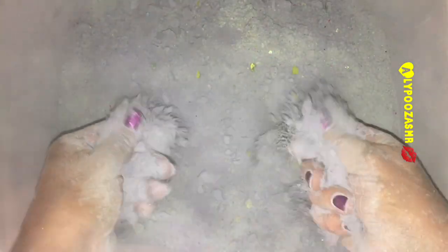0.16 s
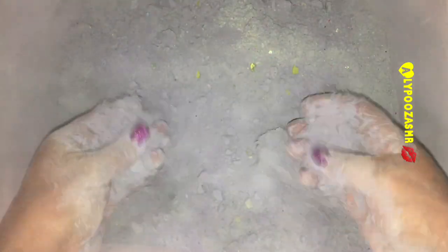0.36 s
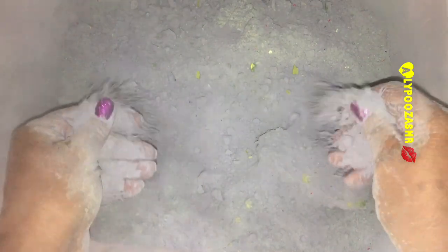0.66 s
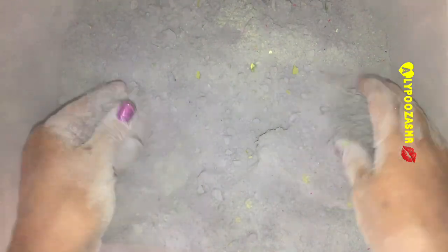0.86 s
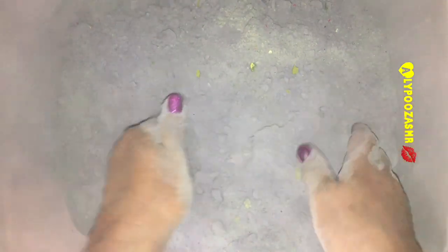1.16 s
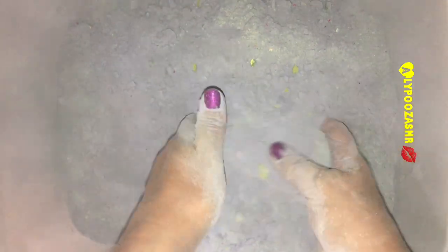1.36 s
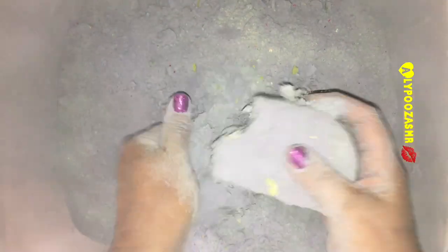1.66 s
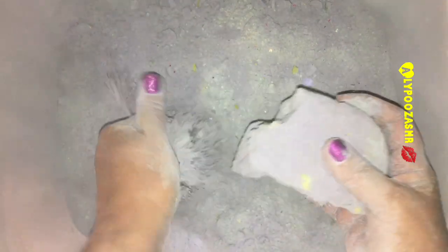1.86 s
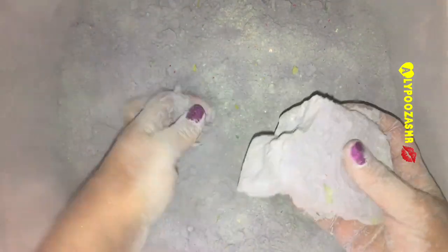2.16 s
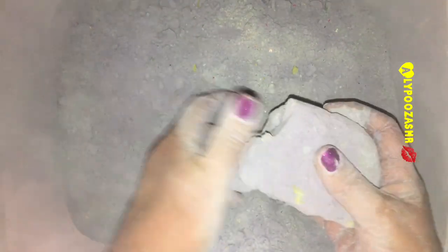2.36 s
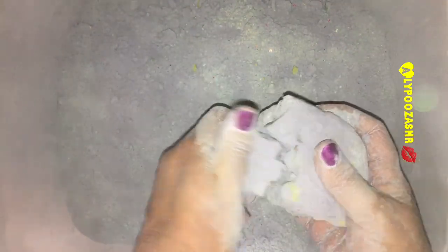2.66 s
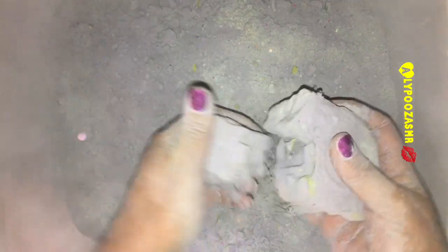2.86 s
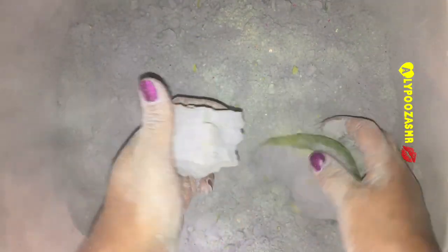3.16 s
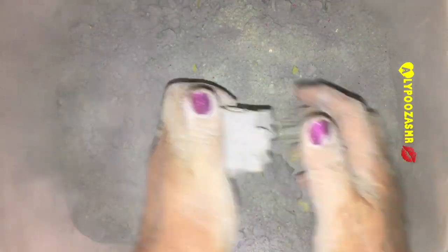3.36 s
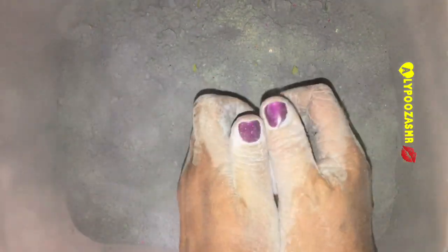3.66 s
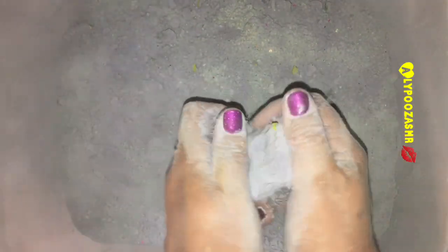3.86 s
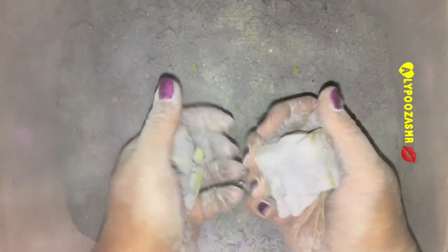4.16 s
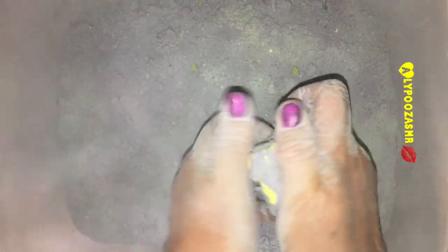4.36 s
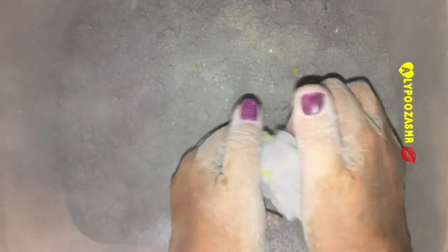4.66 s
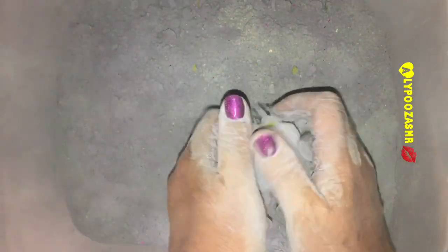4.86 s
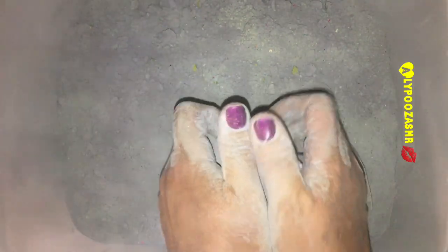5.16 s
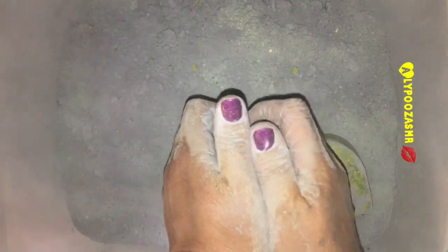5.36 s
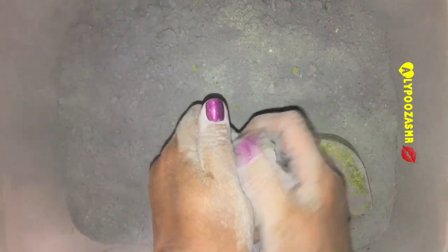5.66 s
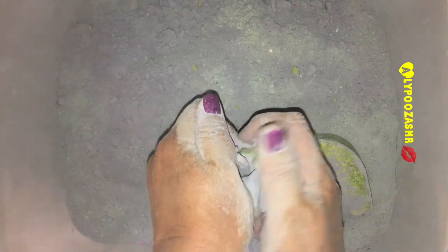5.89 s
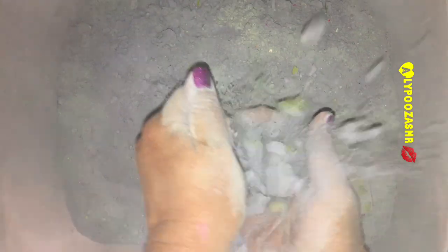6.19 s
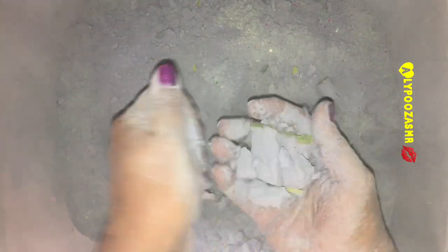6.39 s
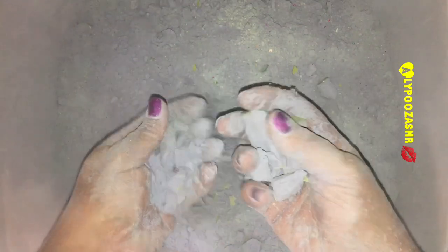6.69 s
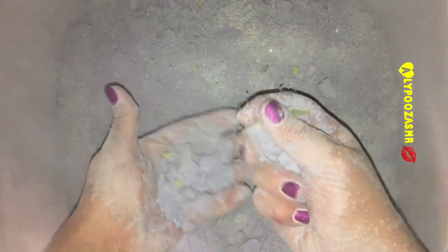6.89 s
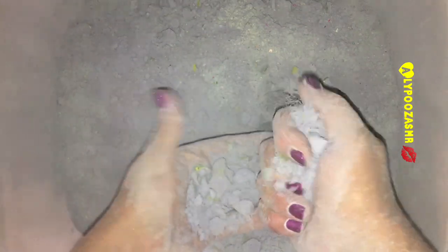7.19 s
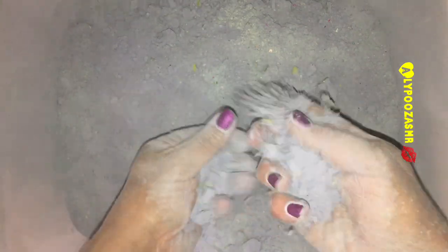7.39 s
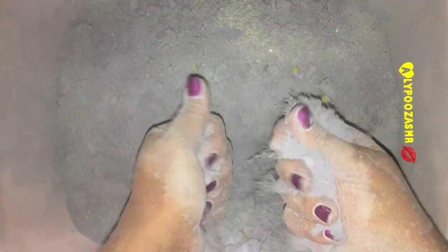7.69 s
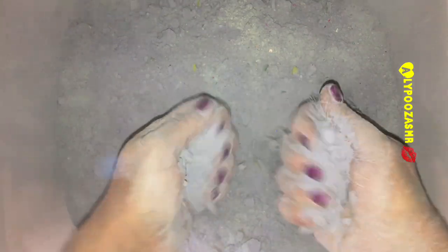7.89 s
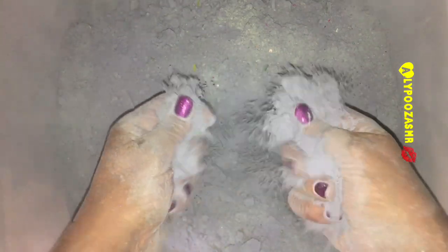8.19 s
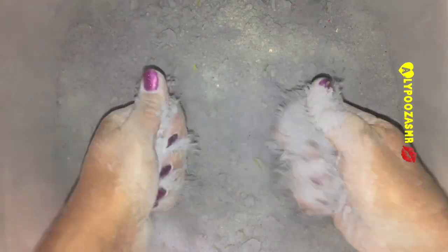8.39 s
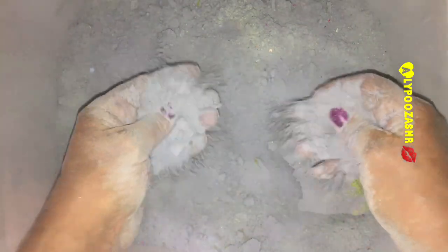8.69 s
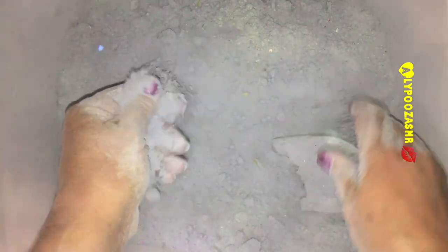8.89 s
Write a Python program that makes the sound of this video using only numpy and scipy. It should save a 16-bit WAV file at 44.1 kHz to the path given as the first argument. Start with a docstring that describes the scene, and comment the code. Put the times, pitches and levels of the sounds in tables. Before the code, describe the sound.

Close dry chalk crumbling: powder rustle, a boomy block knock, small snaps, one loud cluster of crunching cracks, then crumbs and gritty rubbing.

```python
"""Hands crush soft chalk blocks over a plastic tub, close to a small microphone.
Powder hiss and gritty crackle are dense streams of clumping clicks, filtered and played by finger effort;
scrapes are noise in gliding resonances. Snaps ring damped chalk modes, click, splinter and knock the tub.
Crumbs patter on the tub wall, dropped blocks and knuckles boom its floor, and faint room noise lies below."""
import sys
import numpy as np
from scipy import signal
from scipy.io import wavfile
from scipy.ndimage import uniform_filter1d

SR = 44100
rng = np.random.default_rng(int(sys.argv[2]) if len(sys.argv) > 2 else 0)


def put_to_file(sound):
    """Save the sound as 16-bit audio at rate SR, in the file named by the first command-line argument."""
    columns = np.atleast_2d(sound).T  # one column per channel
    safe = np.clip(columns, -1, 1)
    whole_steps = np.round(safe * 32767)
    wavfile.write(sys.argv[1], SR, whole_steps.astype(np.int16))


N = 398663

# Relative spectrum of hissing powder: pitch_hz [Hz], level_db [dB]
POWDER_SPECTRUM = [(2500, -7.5), (4000, -10), (5500, -3.5), (7000, 0.5), (8700, 2), (10500, -4),
                   (13000, -15.5), (16000, -28)]
# Relative spectrum of crackling grit and dry clicks: pitch_hz [Hz], level_db [dB]
GRIT_SPECTRUM = [(900, -8.5), (1500, -12.5), (2000, -3), (2400, -2), (2900, -1.5), (3600, -1.5),
                 (5000, -5.5), (8000, -11)]
# Modes of the plastic tub wall: pitch_hz [Hz], relative level_db [dB], t60_s [s]
WALL_MODES = [(300, -4, 0.036), (450, -3.5, 0.01), (615, 17, 0.0094), (850, 12.5, 0.023), (980, 22, 0.0076),
              (1460, 15.5, 0.016)]


def handling():
    """Streams of grains played by the effort of the fingers, and the tub trembling under the hands."""
    # Steady finger work: start_s [s], powder_db [dB], grit_db [dB],
    # crumbs_db on the tub [dB relative to grit], ticks_db of breaking crumbs [dB relative to grit]
    steady_work = [(0, -55.5, -51.5, 2, -13), (.85, -50, -53, -2.5, -3), (1.1, -52.5, -51, -1, -10),
                   (1.35, -59.5, -51, 7, -30), (1.55, -59.5, -58, 11.5, -4), (1.8, -56.5, -54, 1.5, -15),
                   (2.2, -60, -57, 0.5, -7), (2.45, -60, -59, -4.5, -11), (2.8, -61.5, -63, -13, -4),
                   (3.05, -51, -53.5, 4, -12), (3.3, -61, -67.5, -7.5, -3), (3.9, -59, -61, -18, -15),
                   (4.4, -54.5, -59.5, -29, -16), (5, -61, -62.5, -18, -3), (5.6, -55.5, -55.5, -13, -23),
                   (6.4, -53, -62.5, 2.5, 3), (6.7, -50, -55, 1, 2.5), (7.5, -51.5, -52, 3, -3),
                   (8, -54.5, -56.5, 3, -5), (8.3, -47, -50.5, -0.5, 0), (8.7, -53.5, -53, -2, -13.5),
                   (9.04, -43.5, -48.5, -5.5, -3)]
    # Relative spectrum of the tub's trembling: pitch_hz [Hz], level_db [dB]
    shake_spectrum = [(12, 24), (20, 12.5), (33, -4), (55, -4), (90, -10), (160, -9.5), (250, -18),
                      (400, -30), (800, -32)]
    shake_level_db = -41
    t = np.arange(N) / SR
    start_s, *columns = np.transpose(steady_work)
    powder_db, grit_db, crumbs_db, ticks_db = (np.interp(t, start_s, c) for c in columns)
    rubbing = effort(powder_db, column=2)
    grinding = effort(grit_db, column=3)

    powder = colour(grains(per_s=14000, spread_db=1.0, clump_db=2.5, clump_s=0.018), POWDER_SPECTRUM)
    grit = colour(grains(per_s=2100, spread_db=0.5, clump_db=2.0, clump_s=0.013), GRIT_SPECTRUM)
    crumb_hits = grains(per_s=1200, spread_db=2.5, clump_db=3.0, clump_s=0.024)
    crumbs = signal.oaconvolve(crumb_hits, ring(WALL_MODES))[:N]
    ticks = crumb_ticks(t[:400])
    shake = colour(grains(per_s=2800, spread_db=1.5, clump_db=2.5, clump_s=0.13), shake_spectrum)

    hiss = rubbing * evened(patchy(powder, 0.75))
    tremble = amp(shake_level_db) * evened(shake)
    crackle = evened(patchy(grit, 2.13))
    patter = amp(crumbs_db) * evened(crumbs)
    breaking = amp(ticks_db) * evened(ticks)
    return hiss + tremble + grinding * (crackle + patter + breaking)


def crumb_ticks(t):
    """Crumbs break with one of twelve chalk pitches each, mixed with dry clicks of grit and powder colour."""
    breaks = grains(per_s=260, spread_db=1.6, clump_db=1.0, clump_s=0.06)
    size = rng.integers(0, 12, N)
    breaks = np.clip(breaks, -3, 3)  # holds down the largest ticks
    pitched = sum(signal.oaconvolve(breaks * (size == k), chip(hz, t))[:N]
                  for k, hz in enumerate(np.geomspace(700, 3600, 12)))
    gritty_click = amp(1) * evened(colour(breaks, GRIT_SPECTRUM))
    powdery_click = amp(-3.5) * evened(colour(breaks, POWDER_SPECTRUM))
    return evened(pitched) + gritty_click + powdery_click


def effort(steady_db, column):
    """Gain of one stream: the steady work with its pauses, plus each rub's quick rise, hold and slower fall."""
    # The fingers let go for a moment: middle_s [s], length_s [s], dip_db [dB]
    pauses = [(0.343, 0.083, -7), (0.876, 0.027, -29), (2.353, 0.22, -13), (3.414, 0.12, -10),
              (3.71, 0.07, -10), (4.046, 0.029, -9), (4.3, 0.06, -12), (5.415, 0.024, -18),
              (5.7, 0.031, -14), (5.84, 0.082, -7.5), (6.35, 0.035, -11), (6.586, 0.17, -4.5),
              (7.22, 0.45, -6.5), (8.953, 0.026, -25)]
    # Single rubs and squeezes: start_s [s], hold_s [s], powder_db [dB], grit_db [dB]
    rubs = [(0.124, 0.032, -42.5, -47), (0.442, 0.016, -70, -46), (0.538, 0.14, -55, -51.5),
            (0.915, 0.047, -36, -33), (1.021, 0.035, -42.5, -45.5), (1.171, 0.067, -63, -43.5),
            (1.84, 0.054, -49, -51), (2.01, 0.015, -45.5, -51.5), (2.423, 0.07, -56, -58.5),
            (2.609, 0.014, -50, -46.5), (3.067, 0.076, -51.5, -45.5), (3.203, 0.016, -47, -59),
            (3.517, 0.048, -57, -55), (3.781, 0.0069, -47, -40), (3.836, 0.021, -50, -55),
            (4.138, 0.012, -51.5, -53.5), (4.258, 0.011, -47.5, -54.5), (4.345, 0.16, -46.5, -72),
            (4.53, 0.078, -43.5, -50), (4.716, 0.015, -46.5, -54), (4.868, 0.023, -45, -51.5),
            (4.947, 0.069, -56, -55.5), (5.076, 0.0097, -41.5, -47.5), (5.185, 0.024, -51, -57),
            (5.439, 0.073, -53, -52.5), (5.887, 0.03, -50, -50), (6.054, 0.013, -50, -42.5),
            (6.242, 0.067, -62, -42), (6.504, 0.041, -41, -53.5), (6.734, 0.067, -52, -53),
            (6.941, 0.11, -48.5, -51.5), (7.096, 0.082, -46, -58.5), (7.302, 0.01, -36, -72),
            (7.64, 0.086, -49, -52), (7.843, 0.04, -40, -78), (8.194, 0.06, -71, -47),
            (8.737, 0.097, -65, -46), (8.984, 0.07, -40, -38)]
    rise_db_per_s, fall_db_per_s = 521, 341
    step = 32  # samples between points of the gain curve
    t = np.arange(0, N, step)[:, None] / SR
    middle_s, length_s, dip_db = np.transpose(pauses)
    dips_db = (dip_db * np.exp(-(2 * (t - middle_s) / length_s) ** 4)).sum(1)
    start_s, hold_s, rub_db = np.transpose(rubs)[[0, 1, column]]
    before_db = rise_db_per_s * np.maximum(start_s - t, 0)
    after_db = fall_db_per_s * np.maximum(t - start_s - hold_s, 0)
    rubs_db = rub_db - before_db - after_db
    power = amp(steady_db[::step] + dips_db) ** 2 + (amp(rubs_db) ** 2).sum(1)
    return np.interp(np.arange(N) / SR, t[:, 0], np.sqrt(power))


def grains(per_s, spread_db, clump_db, clump_s):
    """Clicks of uneven size that come in clumps as the fingers slip."""
    chance, size = rng.random(N), rng.exponential(1, N)
    sign, slip = rng.standard_normal(N), rng.standard_normal(N)  # sign also varies the strength
    width = max(int(clump_s * SR), 2)
    clumps = evened(uniform_filter1d(uniform_filter1d(slip, width), width))
    level_db = spread_db * np.minimum(size, 5) + clump_db * clumps
    return (chance < per_s / SR) * sign * amp(level_db)


def patchy(x, patch_db):
    """Random drifting patches of colour across pitch and time."""
    z = signal.stft(x, nperseg=256)[2]
    field = rng.standard_normal(z.shape)
    for _ in range(2):
        field = uniform_filter1d(field, size=6, axis=0)  # across pitch
        field = uniform_filter1d(field, size=14, axis=1)  # along time
    return signal.istft(z * amp(patch_db * evened(field)), nperseg=256)[1][:N]


def scrapes():
    """Friction noise through one gliding resonance, swelling and fading."""
    # Pitched scrapes and one low scuff: start_s [s], end_s [s], level_db before the fades [dB],
    # first_hz [Hz], last_hz [Hz], width_hz [Hz]
    pitched_scrapes = [(1.148, 1.248, -39.5, 6760, 6800, 600), (1.22, 1.387, -40, 870, 980, 330),
                       (1.08, 1.22, -39.5, 129, 203, 121), (1.41, 1.56, -48.5, 860, 720, 248),
                       (3.145, 3.173, -42, 885, 890, 150), (4.32, 4.415, -50.5, 3500, 3450, 400),
                       (4.358, 4.428, -49.5, 1950, 1720, 250), (4.393, 4.527, -46.5, 2650, 2450, 300),
                       (4.515, 4.595, -48, 3440, 3800, 500)]
    out, noise = np.zeros(N), rng.standard_normal(N)
    for start_s, end_s, level_db, first_hz, last_hz, width_hz in pitched_scrapes:
        rub = noise[round(start_s * SR):round(end_s * SR)]
        hz = np.linspace(first_hz, last_hz, len(rub))
        scrape = evened(resonate(rub, hz, width_hz))
        add(out, start_s, amp(level_db) * scrape * np.hanning(len(rub)) ** 0.5)
    return out


def resonate(x, hz, width_hz):
    """Shifts the curve hz down to zero, smooths, and shifts back: a moving resonance of gain 1."""
    turn = np.exp(2j * np.pi * np.cumsum(hz) / SR)
    r = np.exp(-np.pi * width_hz / SR)
    return 2 * (turn * signal.lfilter([1 - r], [1, -r], x / turn)).real


def snaps():
    """A crack and dying smaller cracks ring the chalk, click dryly, splinter and knock the tub."""
    # Snapping pieces: time_s [s], level_db before the parts are mixed [dB], ring_hz [Hz],
    # splinters_db before colouring and mixing [dB], crumbling_t60_s [s]
    breaks = [(0.136, -32, 930, -37, 0.042), (0.445, -19.5, 670, -18.5, 0.037),
              (0.453, -40, 940, -40, 0.015), (0.479, -19, 905, -30, 0.034), (0.891, -27, 850, -32, 0.073),
              (0.902, -13, 674, -38, 0.053), (1.148, -25, 730, -45, 0.038), (1.866, -27.5, 850, -26, 0.085),
              (2.15, -34, 630, -59, 0.13), (2.405, -40, 7250, -31, 0.19), (2.603, -29.5, 1050, -51, 0.13),
              (2.647, -22.5, 2630, -18, 0.024), (3.012, -32, 1480, -48, 0.054),
              (3.062, -28, 1550, -50, 0.046), (3.087, -20, 2060, -47, 0.051),
              (3.262, -34, 2050, -53, 0.021), (3.44, -39.5, 756, -31, 0.058),
              (3.746, -31.5, 2070, -19.5, 0.032), (3.773, -16.5, 2460, -12, 0.12),
              (3.775, -17.5, 6450, -33, 0.03), (4.26, -49, 6900, -17, 0.081),
              (4.669, -36, 3700, -23.5, 0.011), (4.836, -24, 920, -20.5, 0.043),
              (5.208, -25, 6640, -15.5, 0.014), (5.302, -31, 2880, -22, 0.16),
              (5.436, -19, 2800, -17, 0.019), (5.435, -22, 2150, -28, 0.037),
              (5.469, -20.5, 2280, -26, 0.067), (5.486, -17.5, 6400, -9, 0.0067),
              (5.667, -31, 3340, -25, 0.023), (5.7262, -11, 3420, -1.5, 0.019),
              (5.7292, -10.5, 3650, -11, 0.066), (5.732, -20, 8400, -19, 0.027),
              (5.867, -27.5, 2150, -25, 0.039), (5.892, -21.5, 6200, -36, 0.049),
              (6.052, -6, 2010, -6, 0.048), (6.0522, -10, 866, -8, 0.05), (6.132, -31.5, 3380, -26, 0.077),
              (6.192, -27, 700, -38, 0.02), (6.195, -13.5, 4100, -41, 0.0061),
              (6.201, -11.5, 7000, -33, 0.0056), (6.2182, -1.5, 1040, -21, 0.026),
              (6.2192, -0.5, 1043, -17, 0.033), (6.24, -19, 920, -8.5, 0.014),
              (6.268, -16, 1730, -14, 0.008), (6.2769, -3, 870, -32, 0.022), (6.2751, -5, 1620, -15, 0.034),
              (6.286, 2.5, 935, -9, 0.0072), (6.301, -22, 3000, -14, 0.013),
              (6.348, -14.5, 6860, -10, 0.014), (6.357, -19, 7400, -43, 0.031),
              (6.435, -28, 3700, -38, 0.069), (6.7328, -24.5, 1460, -28, 0.0091),
              (6.755, -26.5, 3330, -12, 0.049), (6.856, -26, 3000, -40, 0.046),
              (6.887, -24, 2780, -25, 0.036), (6.95, -25, 2560, -43, 0.029), (7.019, -23, 2310, -16, 0.019),
              (7.035, -24.5, 1920, -38, 0.026), (7.08, -26, 2620, -41, 0.023),
              (7.118, -26, 2580, -37, 0.18), (7.13, -29, 1450, -19, 0.015), (7.45, -24.5, 6870, -39, 0.018),
              (7.565, -24, 3050, -41, 0.028), (7.621, -23, 850, -36, 0.017), (7.63, -20.5, 676, -45, 0.025),
              (7.641, -20, 850, -32, 0.045), (8.203, -19, 2050, -36, 0.0073), (8.228, -25, 649, -35, 0.045),
              (8.26, -27.5, 2330, -26, 0.019), (8.763, -25.5, 1120, -46, 0.019),
              (8.775, -22.5, 1170, -42, 0.04)]
    piece, clicks, splinters, knocks = np.zeros((4, N))
    t = np.arange(4000) / SR
    swell_s, lead_s = 0.005, 0.0035  # noise swells up to the crack from lead_s before the listed time
    noise = rng.standard_normal((len(breaks), 2, len(t)))
    sizes = rng.uniform(-0.68, 1, (len(breaks), 3))
    crack = 1.0 * (np.arange(len(t)) == int(swell_s * SR))
    for (time_s, level_db, hz, splinters_db, t60_s), z, size in zip(breaks, noise, sizes):
        start_s = time_s - lead_s
        decay = amp(-60 * np.maximum(t - swell_s, 0) / max(t60_s, 0.004))
        fade = decay * np.minimum(t / swell_s, 1) ** 3.5
        crumbling = 0.042 * z[0] * abs(z[1]) ** 1.93 * fade  # uneven small cracks
        cracking = crack + crumbling
        body = signal.oaconvolve(crack, chip(hz, t[:500]))
        # the small cracks are dealt out to three fragments of other pitches
        rest = sum(signal.oaconvolve(crumbling * (np.arange(len(t)) % 3 == k),
                                     chip(hz * 2 ** (0.65 * octaves), t[:500]))
                   for k, octaves in enumerate(size))
        octaves_up = np.log2(hz / 800)
        add(piece, start_s, amp(level_db) * (body + rest) / abs(body).max())
        add(clicks, start_s, amp(level_db - 5.0 * octaves_up) * cracking)
        add(splinters, start_s, amp(splinters_db) * (z[0] * fade + 0.5 * cracking))
        # larger, lower pieces jolt the tub more
        add(knocks, start_s, amp(level_db - 3.0 * octaves_up) * cracking)
    dry_clicks = amp(1) * colour(clicks, GRIT_SPECTRUM)
    treble = amp(-13.5) * colour(splinters, POWDER_SPECTRUM)
    return amp(-4) * piece + dry_clicks + treble + amp(-15) * knock_wall(knocks)


def chip(hz, t):
    """Soft-fronted impulse response of a heavily damped chalk piece; high modes weaken in small pieces."""
    # Modes of a chalk piece: multiple of its lowest ring [ratio], relative level_db [dB]
    chalk_modes = [(1.0, 15.5), (1.74, 16), (2.23, 11.5), (2.74, 10.5)]
    total = 0
    for multiple, level_db in chalk_modes:
        mode_hz = multiple * hz
        level = amp(level_db) * (mode_hz < SR / 4) / np.hypot(1, (mode_hz / 2600) ** 2)
        damping = np.exp(-np.pi * (230 + 0.077 * mode_hz) * t)  # higher modes die sooner
        total = total + level * damping * np.sin(2 * np.pi * mode_hz * t)
    return total * (1 - np.exp(-(t * hz / 0.26) ** 2))


def drops():
    """Each crumb clicks dryly and knocks the tub wall; some are more click, some more knock."""
    # Crumbs that drop on the tub: time_s [s], level_db before click and knock are balanced [dB]
    falling_crumbs = [(0.47, -28), (2.054, -38), (2.139, -33), (2.22, -32), (2.967, -29), (3.03, -36),
                      (4.969, -33), (4.977, -30), (6.09, -25), (6.173, -30), (6.249, -17), (6.465, -35),
                      (6.501, -30), (6.596, -39), (6.683, -34), (6.701, -27), (6.815, -35), (6.823, -28),
                      (6.949, -30), (6.965, -25), (6.983, -24), (7.019, -28), (7.119, -21), (7.301, -28),
                      (7.359, -33), (7.399, -26), (7.431, -25), (7.466, -29), (7.762, -28), (7.813, -35),
                      (7.975, -30), (8.138, -26), (8.339, -21), (8.347, -22), (8.433, -28), (8.5, -47),
                      (8.536, -35), (8.55, -37), (8.679, -41), (8.708, -31), (8.967, -15.5)]
    time_s, level_db = np.transpose(falling_crumbs)
    lean_db = 4.3 * rng.uniform(-0.49, 1, len(falling_crumbs))  # towards click
    at = np.round(time_s * SR).astype(int)
    clicks, knocks = np.zeros((2, N))
    clicks[at] = amp(level_db + lean_db)
    knocks[at] = amp(level_db - lean_db)
    return amp(7.5) * colour(clicks, GRIT_SPECTRUM) + amp(-6.5) * knock_wall(knocks)


def knock_wall(knocks):
    """Rings the tub wall with each knock, the response scaled to a peak of 1."""
    wall = ring(WALL_MODES)
    return signal.oaconvolve(knocks, wall / abs(wall).max())[:N]


def thumps():
    """A soft push of up to some milliseconds sets the tub floor booming."""
    # Blocks and knuckles on the floor: time_s [s], peak_db [dB], hardness_db [dB per octave], push_s [s]
    floor_hits = [(0.472, -34, -22, 0.0068), (0.89, -11, 3, 0.0076), (0.903, -7.5, -5.5, 0.0036),
                  (1.021, -25.5, -4, 0.0094), (1.148, -29.5, -1, 0.0024), (2.151, -36, 8, 0.0013),
                  (3.101, -22.5, 15, 0.00035), (3.108, -22, 17, 0.00098), (3.11, -18, 10.5, 0.0036),
                  (3.772, -36.5, 38, 0.002), (4.842, -27.5, 1.5, 0.0048), (6.051, -19, 11, 0.0085),
                  (6.222, -19.5, 4.5, 0.00069), (6.2795, -2, 39, 0.00035), (6.287, -10.5, 12.5, 0.003),
                  (8.773, -29.5, 6, 0.011), (8.964, -23, -23, 0.0098), (8.981, -13.5, -10, 0.0069)]
    # Modes of the tub floor: pitch_hz [Hz], relative level_db [dB], t60_s [s]
    floor_modes = [(54.7, 7.5, 0.21), (111.6, 7, 0.088), (169.5, -5, 0.082), (258.5, -12.5, 0.11),
                   (308, -4, 0.057), (460, -8.5, 0.014)]
    out = np.zeros(N)
    for time_s, peak_db, hardness_db, push_s in floor_hits:
        push = np.hanning(max(int(push_s * SR), 3))
        boom = np.convolve(ring(floor_modes, hardness_db), push)
        add(out, time_s, -amp(peak_db) * boom / abs(boom).max())
    return out


def tub_echo(x):
    """Sparse short reflections from the walls of the tub."""
    t = np.arange(2000) / SR
    strength = rng.standard_normal(len(t))
    sparse = rng.random(len(t)) < 0.05
    t60_s, first_s = 0.027, 0.0015
    taps = strength * sparse * (t > first_s) * amp(-60 * t / t60_s)
    return signal.oaconvolve(x, taps / np.linalg.norm(taps))[:N]


def room_tone():
    """Steady noise shaped by the spectrum of the quiet room."""
    # Relative spectrum of the room: pitch_hz [Hz], level_db [dB]
    room_spectrum = [(150, 2), (200, -14), (330, 18), (480, -17.5), (1500, -57), (4000, -55), (8400, -47),
                     (16000, -30)]
    return amp(-75.5) * evened(colour(rng.standard_normal(N), room_spectrum))


def ring(modes, hardness_db=0):
    """Impulse response of dying modes; a harder blow lifts them by some dB an octave."""
    t = np.arange(SR // 3) / SR
    total = 0
    for hz, level_db, t60_s in modes:
        lift_db = hardness_db * np.log2(hz / modes[0][0])
        total = total + amp(level_db + lift_db - 60 * t / t60_s) * np.sin(2 * np.pi * hz * t)
    return total


def colour(x, points):
    """Filters by a spectrum with causal phase, so that clicks keep a sharp front."""
    f, db = np.transpose(points)
    hz = abs(np.fft.fftfreq(8192, 1 / SR))
    curve_db = np.interp(np.log(hz + 1), np.log(f), db, left=db[0] - 10.0, right=db[-1] - 15.5)
    log_gain = np.log(amp(curve_db))
    taps = np.fft.ifft(np.exp(np.conj(signal.hilbert(log_gain)))).real[:4096]  # minimum phase
    return signal.oaconvolve(x, taps)[:len(x)]


def amp(db):
    """Turns decibels into a linear gain."""
    return 10 ** (np.asarray(db) / 20)


def evened(x):
    """Scales a signal to an RMS of 1."""
    return x / np.sqrt(np.mean(x ** 2) + 1e-20)


def add(mix, start_s, sound):
    """Lays a sound into the mix at a time, cut at the end of the mix."""
    part = mix[round(start_s * SR):][:len(sound)]
    part += sound[:len(part)]


def scene():
    """Mixes the handling, scrapes, snaps and drops with their tub echo, thumps and room."""
    cracks = snaps() + drops()
    room = room_tone()
    hands = handling() + scrapes()
    echo = amp(-11.0) * tub_echo(cracks)
    return (hands + cracks + echo + thumps() + room)[None]


def record(dry):
    """The microphone loses the deepest bass and clips at full scale; then the band limit cuts the top."""
    low_cut_hz, edge_hz = 20.7, 15900
    thinned = signal.lfilter(*signal.butter(2, low_cut_hz, "high", fs=SR), dry)
    heard = np.clip(thinned, -1, 1)
    band_limit = signal.firwin(511, edge_hz, window=("kaiser", 9), fs=SR)
    return signal.oaconvolve(heard, band_limit[None], "same")


dry = scene()
out = record(dry)
put_to_file(out)
```